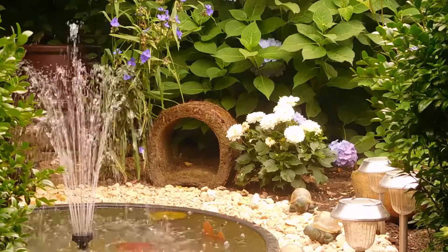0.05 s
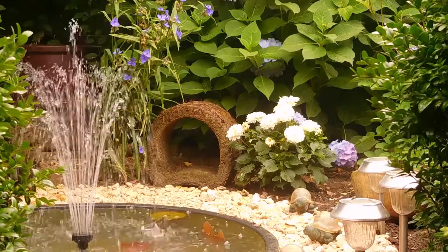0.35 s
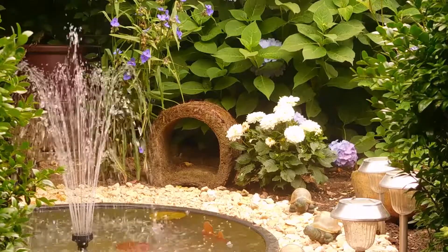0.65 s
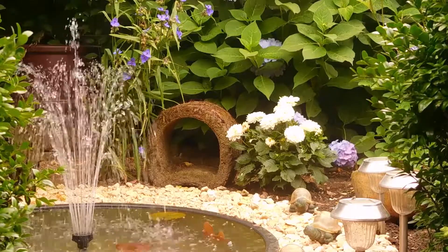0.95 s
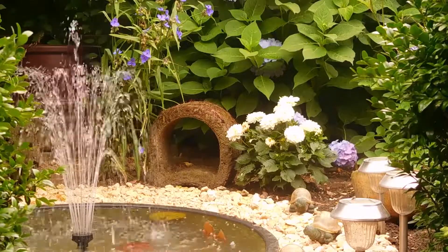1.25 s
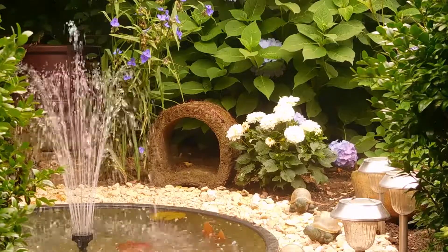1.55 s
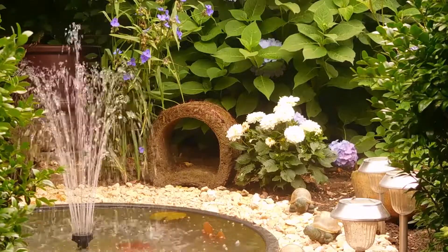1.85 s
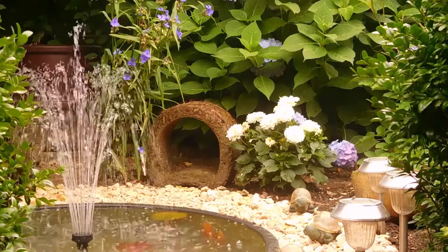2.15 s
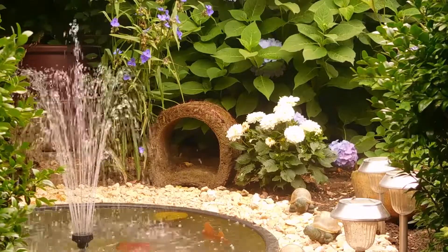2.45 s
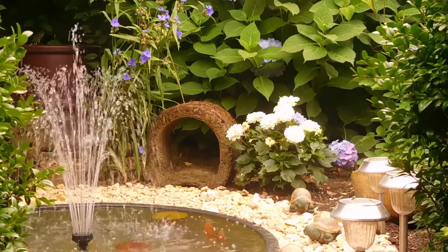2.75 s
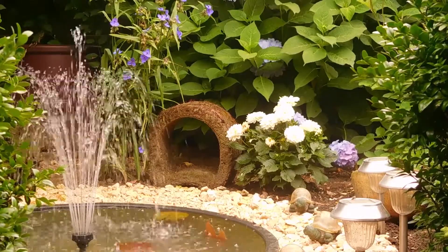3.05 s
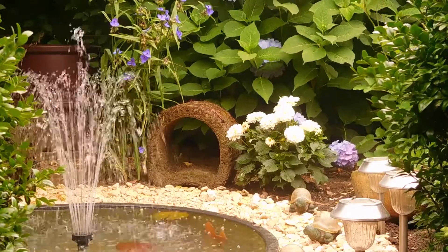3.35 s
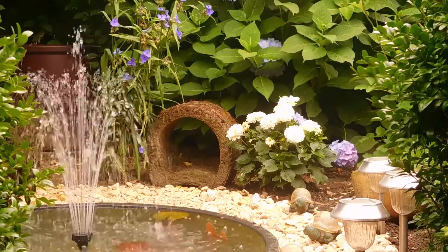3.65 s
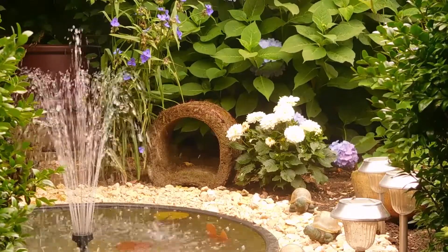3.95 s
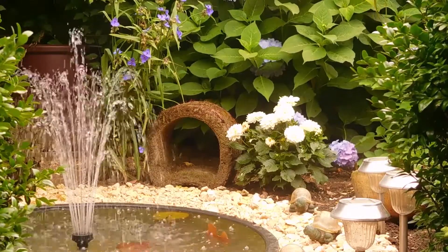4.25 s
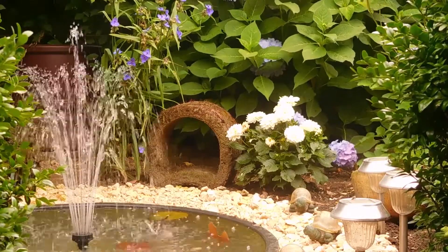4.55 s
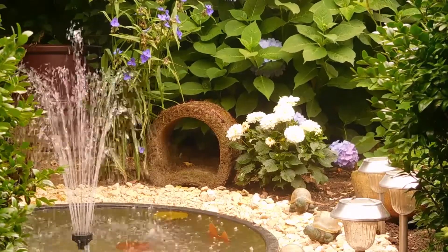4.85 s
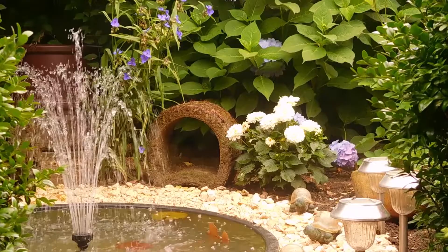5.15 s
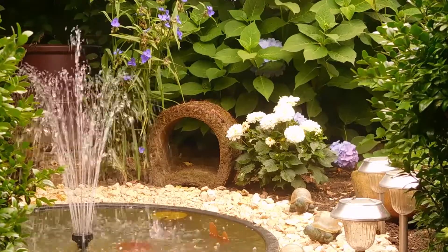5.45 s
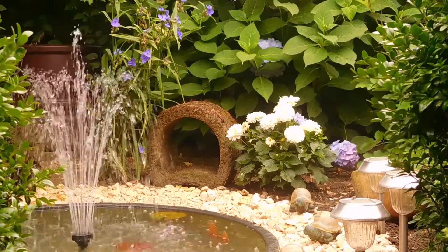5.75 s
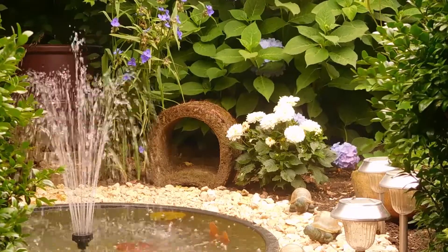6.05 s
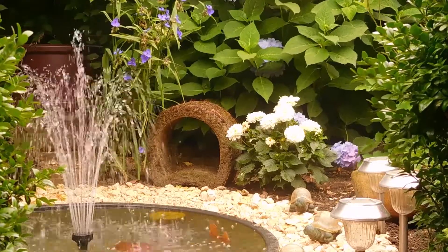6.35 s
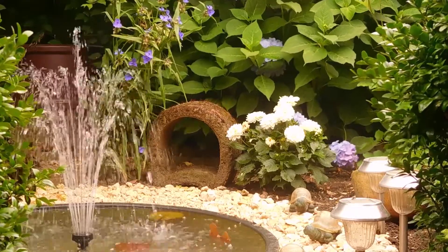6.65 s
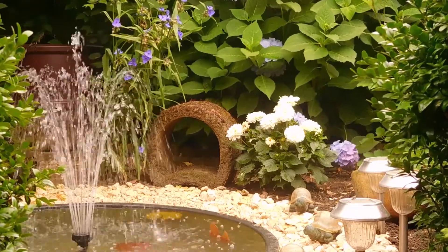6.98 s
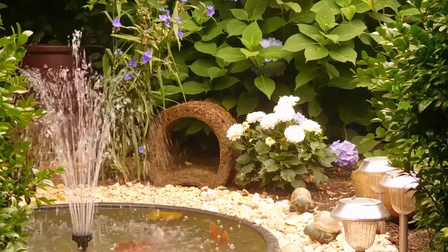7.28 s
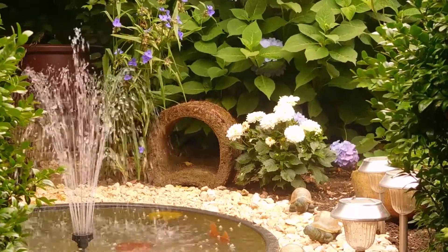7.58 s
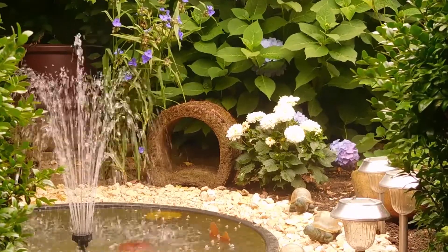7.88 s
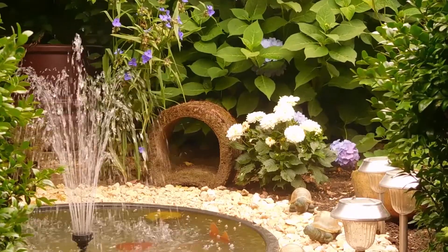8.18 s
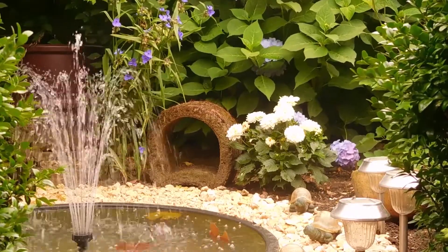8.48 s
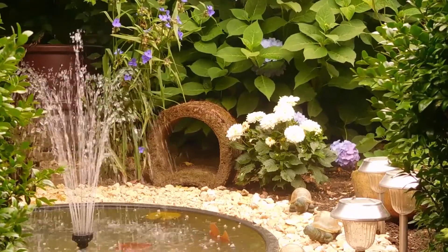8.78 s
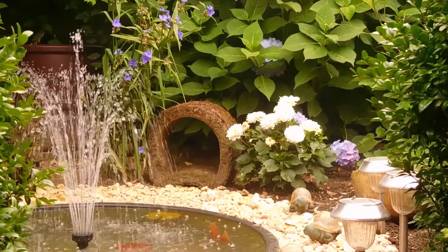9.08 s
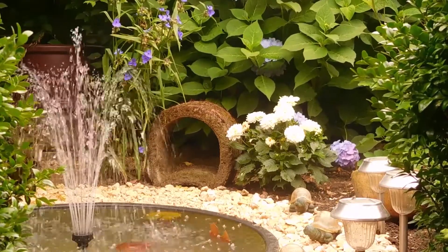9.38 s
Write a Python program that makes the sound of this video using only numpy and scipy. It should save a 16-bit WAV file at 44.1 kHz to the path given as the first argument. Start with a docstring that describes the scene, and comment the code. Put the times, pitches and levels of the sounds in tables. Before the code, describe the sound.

Fine jets of water patter and gurgle into a pond over a faint distant rumble, as a light breeze buffets the microphone later on.

```python
"""A small fountain throws fine jets that fall back onto a garden pond.
From the start, drops tick on the surface in clumps, the larger ones trap air that plops with a rising
pitch, and the finest spray hisses; rim and plants scatter the sound above a distant rumble.
At about 5.6 s a breeze reaches the microphone, just before the loudest drop lands close by.
A few gusts follow, the last and weakest near 9.2 s, while the water keeps falling."""
import sys
import numpy as np
from scipy import signal
from scipy.fft import rfft, irfft
from scipy.io import wavfile

SR = 44100
rng = np.random.default_rng(int(sys.argv[2]) if len(sys.argv) > 2 else 0)


def log_audio(samples):
    """Write samples as a 16-bit WAV file to the path given in sys.argv[1]."""
    # one column per channel
    frames = np.atleast_2d(samples).T
    # limit to full scale, then quantise
    limited = np.clip(frames, -1, 1)
    pcm = np.round(limited * 32767).astype(np.int16)
    wavfile.write(sys.argv[1], SR, pcm)


N = 419832
TIME = np.arange(N) / SR
CUTOFF_HZ = 15900


def from_db(db):
    """Amplitude ratio of a level in decibels."""
    return 10 ** (np.asarray(db) / 20)


def rms_one(x):
    """Normalisation to unit rms."""
    return x / np.sqrt(np.mean(x ** 2) + 1e-20)


def at_hz(points, hz):
    """Interpolation of a spectrum on a log-frequency axis."""
    known_hz, values = np.transpose(points)
    return np.interp(np.log(np.maximum(hz, 1)), np.log(known_hz), values)


def cut(x, hz, kind, order=2):
    """Butterworth low- or high-pass filter."""
    return signal.sosfilt(signal.butter(order, hz, kind, fs=SR, output="sos"), x + 1e-18)


def drift(corner_hz):
    """Random modulation: low-passed noise of unit rms."""
    hz = np.arange(N // 2 + 1) * SR / N
    return rms_one(irfft(rfft(rng.standard_normal(N)) / (1 + (hz / corner_hz) ** 2), N))


def swell(start, length, attack_s, release_s):
    """Exponential growth until `start`, a hold for `length`, then exponential decay."""
    return np.exp(np.minimum(TIME - start, 0) / attack_s - np.maximum(TIME - start - length, 0) / release_s)


def diffuse_noise(spectrum, size=N):
    """A diffuse field is coherent between the channels in the bass and nearly incoherent in the treble."""
    # left-right coherence: (frequency [Hz], coherence [-1..1])
    coherence = [(60, 1), (300, 0.89), (700, 0.79), (1400, 0.85), (3200, 0.42), (7000, 0.099),
                 (15000, 0.14)]
    hz = np.arange(size // 2 + 1) * SR / size
    alike = np.clip(at_hz(coherence, hz), -1, 1)
    mid, side = rfft(rng.standard_normal((2, size))) * from_db(at_hz(spectrum, hz))
    return rms_one(irfft(np.sqrt(1 + alike) * mid + np.sqrt(1 - alike) * side * [[1], [-1]], size))


def pings(s, db, hz, life, rise, damping, attack_s, pan_db, lag_spread_s=1.1e-5):
    """Damped oscillators glide up `rise` octaves; time and level differences place each on the pond."""
    length = (life * SR).astype(int) + 2
    event = np.repeat(np.arange(len(s)), length)
    sample = np.arange(length.sum()) + ((s * SR).astype(int) - np.cumsum(length) + length)[event]
    across, tilt = rng.standard_normal((len(s), 2)).T
    left_lead_s = 1.3e-5 + lag_spread_s * across
    channels = []
    for side in (.5, -.5):
        age = np.clip((sample / SR - (s - side * left_lead_s)[event]) / life[event], 0, 1)
        cycles = (hz * life)[event] * (age + (2 ** rise - 1)[event] * age ** 3 / 3)
        attack = 1 - np.exp(-age * life[event] / attack_s)
        decay = np.exp(-damping * age) * (1 - age ** 4)
        wave = from_db(db + side * pan_db * tilt)[event] * attack * decay * np.sin(2 * np.pi * cycles)
        channels.append(np.bincount(np.maximum(sample, 0), wave, N)[:N])
    return np.array(channels)


def by_chance(count, db, hz, cycles, spread_db, spread_octaves):
    """Random events at a steady mean rate: (time [s], level [dB], frequency [Hz], life [s])."""
    when, force, pitch, stay = rng.random((count, 4)).T
    hz = hz * 2 ** (spread_octaves * (2 * pitch - 1))
    s = (np.arange(count) + when) / count * N / SR
    life = cycles / hz * 2 ** (2 * stay - 1)
    return np.column_stack([s, db + spread_db * (2 * force - 1), hz, life])


def rumble():
    """Distant sound arrives as a diffuse field of low frequencies."""
    # rumble spectrum: (frequency [Hz], relative density [dB])
    spectrum = [(20, -4), (45, -7), (68, 0), (110, -5), (200, -8.5), (320, -17.5), (700, -18), (2000, -39)]
    return from_db(-56.0) * diffuse_noise(spectrum)


def buffets(force, lumps_db=9.0, bright_db=-35.0):
    """Turbulent pressure on one port comes in lumps; only strong gusts reach above the deep bass."""
    # eddy spectrum: (frequency [Hz], relative density [dB])
    spectrum = [(20, 1.5), (45, 1), (100, -4), (180, -11.5), (320, -16), (500, -31.5), (1000, -52)]
    eddies = diffuse_noise(spectrum)[0]
    deep = cut(eddies, 87, "low", order=1)
    lumps = rms_one(from_db(lumps_db * np.tanh(drift(22))))
    strong = np.clip(force * lumps / from_db(bright_db), 0, 1)
    return force * lumps * (deep + strong * (eddies - deep))


def wind(left_db=7.0, shared=0.14):
    """Flow noise: the left port faces the breeze; the right gets part of its eddies and its own weaker."""
    # gusts on the microphone: (time [s], duration [s], relative level [dB])
    gust_events = [(5.712, 0.086, -37.5), (5.903, 0.12, -38), (6.099, 0.055, -36), (6.575, 0.29, -40),
                   (7.792, 0.264, -43.5), (9.19, 0.12, -50)]
    breeze = from_db(-52.5) * swell(start=5.6, length=1.8, attack_s=0.22, release_s=1.3)
    gusts = [from_db(db) * swell(s, length, attack_s=0.041, release_s=0.053)
             for s, length, db in gust_events]
    force = np.max([breeze, *gusts], axis=0)
    left = from_db(left_db) * buffets(force)
    return np.array([left, shared * left + buffets(force)])


def garden(x, t60=0.1, first_echo_s=0.0011, size=8192, spots=5):
    """Scattering by rim, pebbles and leaves gives each landing spot its own short impulse response."""
    t = np.arange(size) / SR
    fade = from_db(-60 * t / t60) * np.clip(t / first_echo_s - 1, 0, 1)
    shares = np.array([drift(13.8) for _ in range(spots)])
    scattered = 0
    for share in shares / np.linalg.norm(shares, axis=0):
        echoes = diffuse_noise([(1000, 7.8), (4000, 7.7), (15000, 3.6)], size=size) * fade
        echoes = echoes / np.sqrt(np.sum(echoes ** 2) / 2)
        scattered = scattered + signal.oaconvolve((share * x.mean(axis=0))[None], echoes, axes=1)[:, :N]
    return scattered


def mist(ticks, follow=0.31, burst_s=0.0033):
    """The finest spray sums incoherently to a hiss; each clump that lands throws up a short burst of it."""
    # spray spectrum: (frequency [Hz], relative density [dB])
    spectrum = [(150, -8.5), (400, -7.5), (900, -1.5), (1400, -1), (2200, -6), (3500, -1), (6000, -4.5),
                (10000, -3.5), (15500, -4.5)]
    pole = np.exp(-1 / (burst_s * SR))
    impacts = np.sqrt(signal.lfilter([1 - pole], [1, -pole], np.mean(ticks ** 2, axis=0)))
    return diffuse_noise(spectrum) * rms_one(1 - follow + follow * impacts)


def bubble_cloud(levels, count, spread_db, cycles, rise, attack_s, pan_db):
    """Minnaert resonance of bubbles born at random: the smaller ones ring higher and more briefly."""
    when, pitch, bend, stay = rng.random((count, 4)).T
    lowest, highest = levels[0][0], levels[-1][0]
    hz = lowest * (highest / lowest) ** pitch
    db = at_hz(levels, hz) + spread_db * np.minimum(rng.standard_normal(count), 1.6)
    life = cycles / hz * 2 ** (2 * stay - 1)
    s = when * N / SR
    return rms_one(pings(s, db, hz, life, 2 * rise * bend, damping=1.6, attack_s=attack_s, pan_db=pan_db))


def gurgle():
    """Mid-sized bubbles resonate and overlap into a gurgle."""
    # bubble strength by pitch: (frequency [Hz], relative level [dB])
    levels = [(520, -13.5), (750, -3.5), (1000, 4.5), (1400, 7.5), (1900, 8), (2800, -28)]
    return bubble_cloud(levels, 2000, spread_db=4.5, cycles=13.2, rise=0.31, attack_s=0.0023, pan_db=1.0)


def plinks():
    """The tiniest bubbles resonate in the treble."""
    # bubble strength by pitch: (frequency [Hz], relative level [dB])
    levels = [(2200, -7), (3300, 2.5), (4400, 3.5), (6000, -1), (8000, 7.5), (11000, -17)]
    return bubble_cloud(levels, 2200, spread_db=3.5, cycles=9.8, rise=0.092, attack_s=0.00025, pan_db=7.0)


def plops(shed_db=-2.5, shed_count=4):
    """The resonance of a trapped bubble rises as it nears the surface, shedding smaller bubbles."""
    # loudest large bubbles: (time [s], level [dB], starting frequency [Hz], life [s])
    loudest = [(0.186, -41, 760, 0.035), (0.272, -30.5, 1290, 0.005), (0.79, -34, 1436, 0.014),
               (0.818, -41, 506, 0.042), (0.861, -32, 1160, 0.018), (1.086, -37.5, 1010, 0.049),
               (1.128, -36.5, 773, 0.026), (1.264, -36, 826, 0.022), (1.55, -39, 640, 0.04),
               (1.79, -38, 391, 0.1), (2.241, -45, 508, 0.042), (2.571, -38.5, 857, 0.05),
               (3.025, -33, 1920, 0.018), (3.405, -37.5, 615, 0.052), (3.789, -45, 396, 0.14),
               (3.887, -36.5, 1007, 0.019), (3.972, -38.5, 1075, 0.034), (4.607, -32.5, 926, 0.016),
               (4.645, -39, 605, 0.046), (4.867, -37, 800, 0.015), (4.914, -38, 787, 0.057),
               (5.029, -28, 803, 0.0087), (5.619, -33, 1080, 0.011), (5.83, -44, 500, 0.062),
               (5.903, -34, 1150, 0.018), (6.893, -35.5, 550, 0.058), (7.103, -36.5, 685, 0.014),
               (7.342, -37, 885, 0.066), (7.527, -41, 564, 0.098), (8.336, -38, 890, 0.022),
               (8.845, -37, 915, 0.03), (9.366, -33.5, 980, 0.02)]
    softer = by_chance(count=36, db=-40, hz=1065, cycles=26, spread_db=2.5, spread_octaves=.6)
    rows = np.vstack([loudest, softer])
    s, db, hz, life = rows.T
    rise = 1.05 * np.sqrt(life / .05)   # octaves; a longer life gives a wider glide
    large = pings(s, db, hz, life, rise, damping=0.51, attack_s=0.00013, pan_db=-0.5)
    # the water that traps the air lands with a brief smack
    smack = pings(s, db + 3.5, 2 * hz, 0.88 / hz, 0 * s, damping=1.5, attack_s=5e-5, pan_db=-1.0)
    s, db, hz, life, rise = np.repeat([s, db, hz, life, rise], shed_count, axis=1)
    when, smaller = rng.random((2, len(s)))
    hz = hz * 2 ** (0.3 + 1.475 * smaller)
    shed = pings(s + when * life, db + shed_db, hz, 10 / hz, rise / 2,
                 damping=2.0, attack_s=0.00043, pan_db=-2.0)
    return large + cut(smack, 510, "high") + shed


def patter(clumps=1500, size=9, clump_s=.003, clump_db=3.0, drop_db=2.5, cycles=7.0):
    """Jet break-up makes slugs of water; each lands as a clump of droplets that tick for a few cycles."""
    # tick strength by pitch: (frequency [Hz], relative level [dB])
    levels = [(1700, -14.5), (3300, -3.5), (4400, -5.5), (6000, 1.5), (8500, 3.5), (11500, 9), (15000, 9)]
    landing = np.repeat(rng.random(clumps) * N / SR, size)
    weight = np.repeat(np.minimum(rng.standard_normal(clumps), 2.3), size)
    s = landing + clump_s * rng.exponential(1, clumps * size) * rng.random(clumps * size)
    pitch, stay = rng.random((2, clumps * size))
    lowest, highest = levels[0][0], levels[-1][0]
    hz = lowest * (highest / lowest) ** pitch
    force_db = np.minimum(clump_db * weight + drop_db * rng.standard_normal(len(s)), 13.0)
    db = at_hz(levels, hz) + force_db
    life = cycles / hz * 2 ** (2 * stay - 1)
    ticks = pings(s, db, hz, life, 0.13 * stay, damping=2.3, attack_s=4e-5, pan_db=1.5)
    return rms_one(cut(ticks, 1600, "high"))


def heavy_drops(gain_db=7.5, droplets=8, spatter_db=-13.0, spatter_s=.003, scatter_octaves=0.72):
    """A nearby impact radiates a heavily damped slap and throws off droplets that land just after it."""
    # loudest drops: (time [s], relative level [dB], frequency [Hz], life [s])
    loudest = [(0.428, -18, 3730, 0.0006), (0.637, -21, 3700, 0.0013), (1.271, -24, 8950, 0.0011),
               (1.418, -25, 2670, 0.0036), (1.587, -26, 2480, 0.0048), (2.291, -20, 4170, 0.0013),
               (2.432, -20.5, 3900, 0.0035), (2.769, -27.5, 8000, 0.0022), (2.955, -28, 4500, 0.0064),
               (3.258, -27.5, 3670, 0.0063), (3.68, -17, 9250, 0.0004), (4.67, -26.5, 4330, 0.0055),
               (4.936, -22, 3560, 0.004), (5.006, -23, 5100, 0.0018), (5.334, -19.5, 8400, 0.0019),
               (5.519, -17.5, 4430, 0.0015), (5.69, -5.5, 8900, 0.00075), (6.46, -12, 4530, 0.0018),
               (7.159, -20, 4600, 0.001), (7.368, -18.5, 10000, 0.00083), (7.443, -17.5, 3620, 0.00048),
               (7.489, -19.5, 8270, 0.00093), (7.61, -19, 5000, 0.00027), (8.273, -20, 6900, 0.00059),
               (8.521, -26, 3440, 0.0036), (8.899, -20, 3050, 0.0011)]
    softer = by_chance(count=26, db=-24.5, hz=6970, cycles=5.4, spread_db=-1.0, spread_octaves=0.78)
    rows = np.vstack([loudest, softer])
    s, db, hz, life = rows.T
    slaps = pings(s, db + gain_db, hz, life, 0 * s,
                  damping=5.9, attack_s=3e-5, pan_db=3.5, lag_spread_s=4e-6)
    delay, detune, force = rng.standard_normal((len(s) * droplets, 3)).T
    s, db, hz, life = np.repeat(rows, droplets, axis=0).T
    s = s + spatter_s * np.abs(delay)
    hz = np.minimum(np.sqrt(hz * 3500) * 2 ** (scatter_octaves * detune), CUTOFF_HZ)
    db = np.minimum(db, -17.0) + spatter_db + 4.2 * force
    spatter = pings(s, db, hz, 8.7 / hz, 0 * s, damping=3.4, attack_s=5e-5, pan_db=0.0)
    return cut(slaps + spatter, 1360, "high")


def scene():
    """Superposition of the falling water, its echoes, the rumble and the wind."""
    sway = drift(28)   # the pump's flow is steady, but the jets sway, so the water arrives unevenly
    spray = from_db(-44 + 1.07 * sway)
    tiny_bubbles, mid_bubbles, ticks = plinks(), gurgle(), patter()
    splashes = spray * (from_db(-3.0) * ticks + from_db(-5.5) * tiny_bubbles) + heavy_drops()
    ripple = rms_one(from_db(2.0 * drift(155)))   # the churned surface makes the ringing waver
    bubbles = ripple * (from_db(-50.0 + sway) * mid_bubbles + plops())
    echoes = garden(from_db(-6.5) * splashes + from_db(-6.0) * bubbles)
    hiss = spray * mist(ticks)
    return splashes + bubbles + echoes + hiss + rumble() + wind()


def record(dry):
    """Band limiting: an elliptic low-pass cuts the top steeply."""
    return signal.sosfilt(signal.ellip(12, .1, 80, CUTOFF_HZ, fs=SR, output="sos"), dry)


dry = scene()
out = record(dry)
log_audio(out)
```